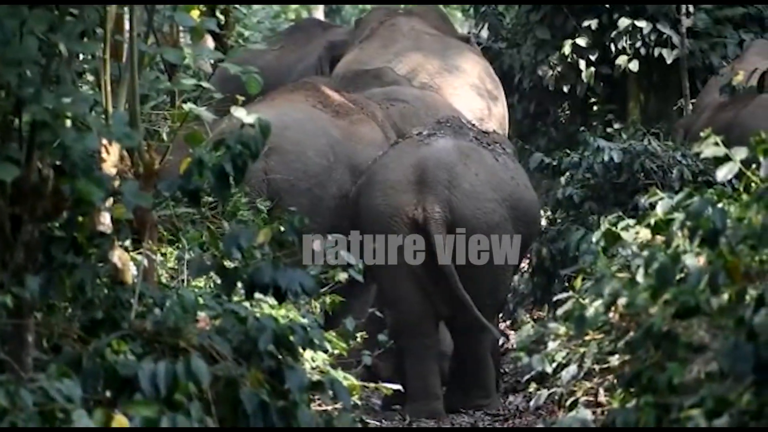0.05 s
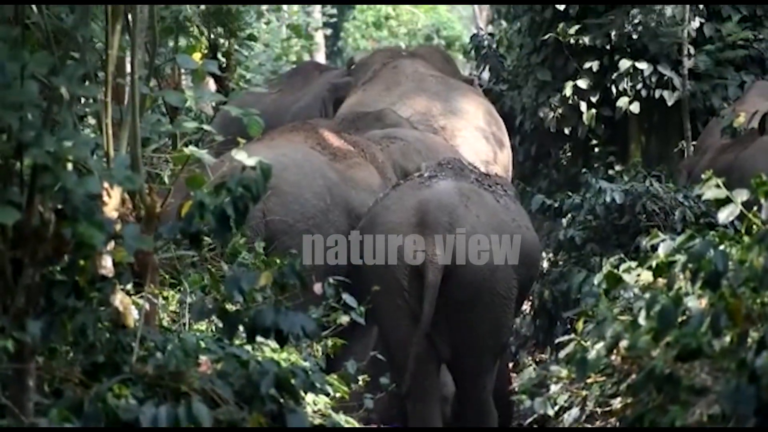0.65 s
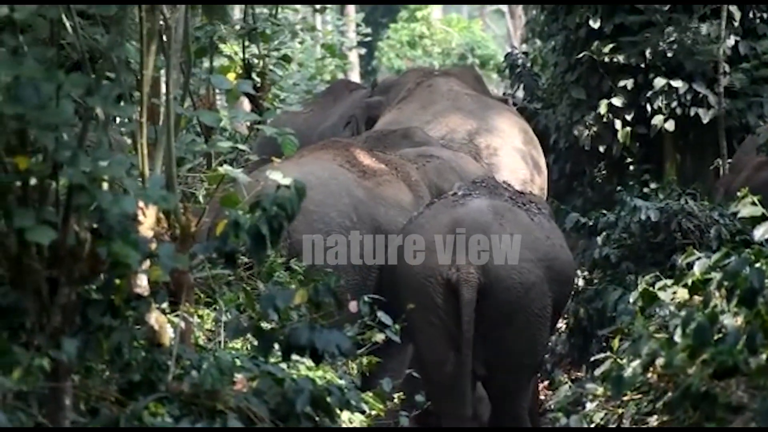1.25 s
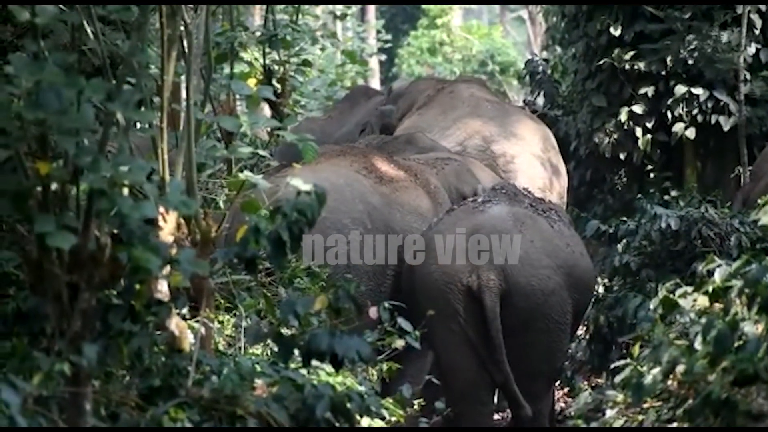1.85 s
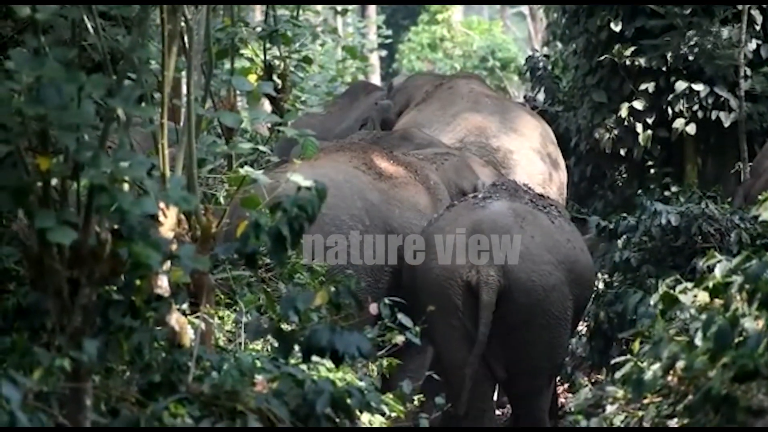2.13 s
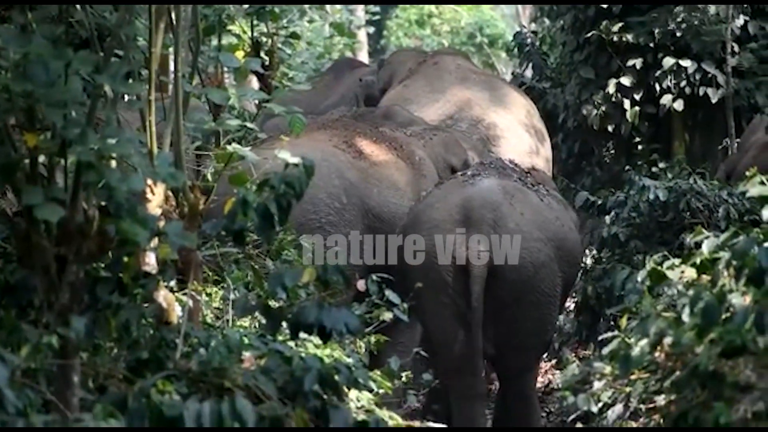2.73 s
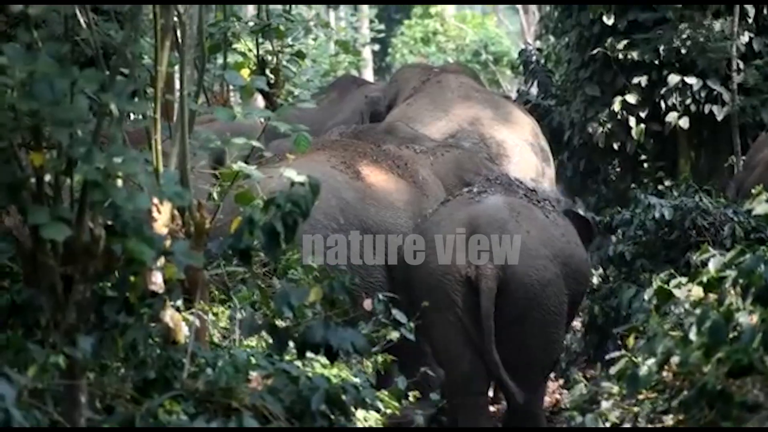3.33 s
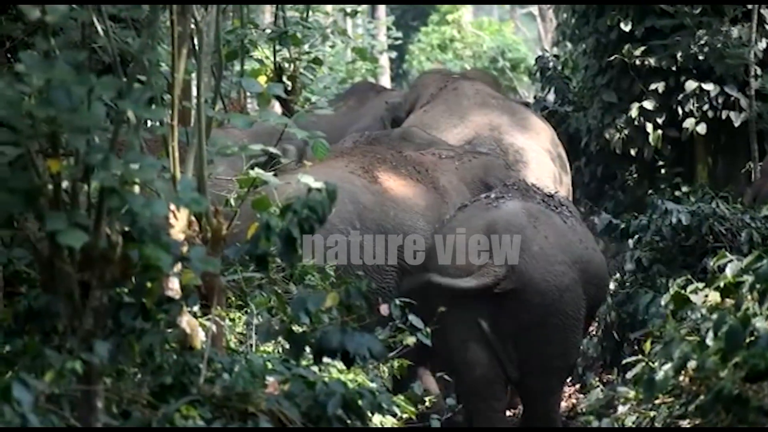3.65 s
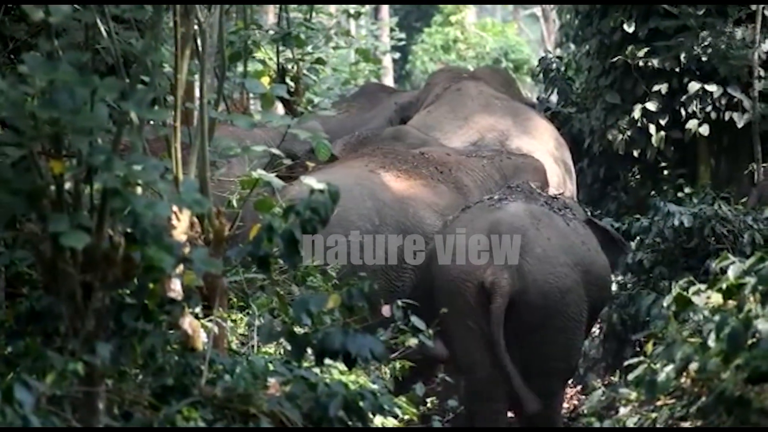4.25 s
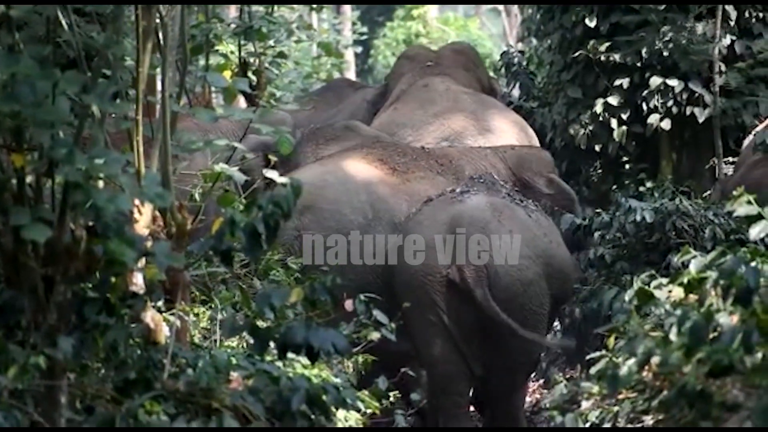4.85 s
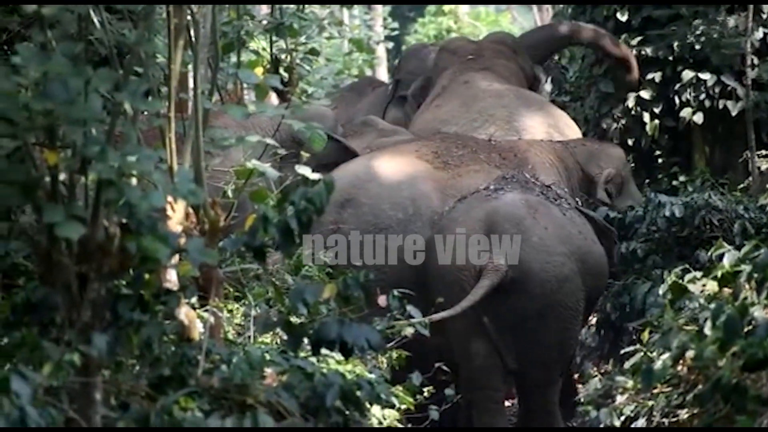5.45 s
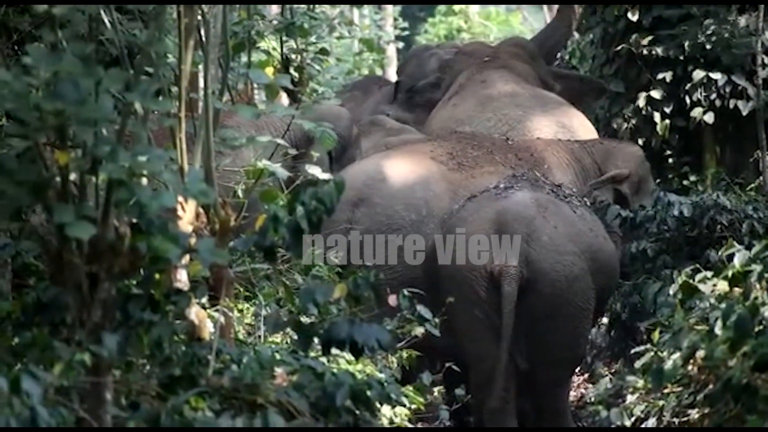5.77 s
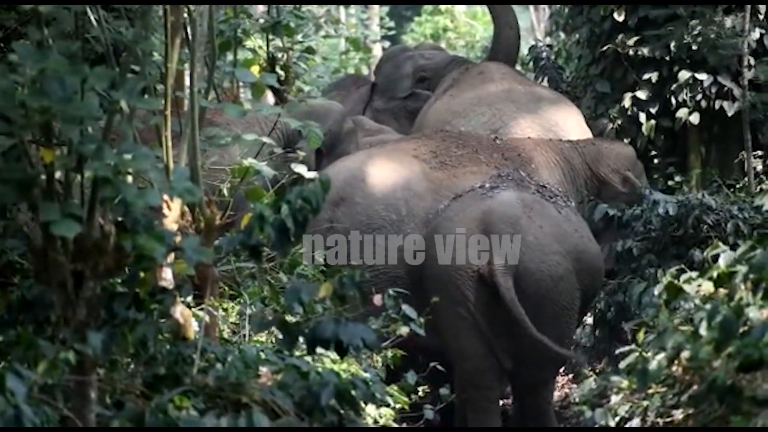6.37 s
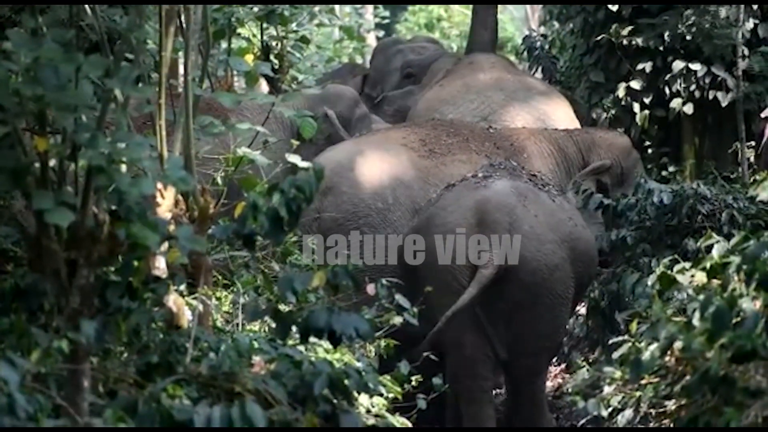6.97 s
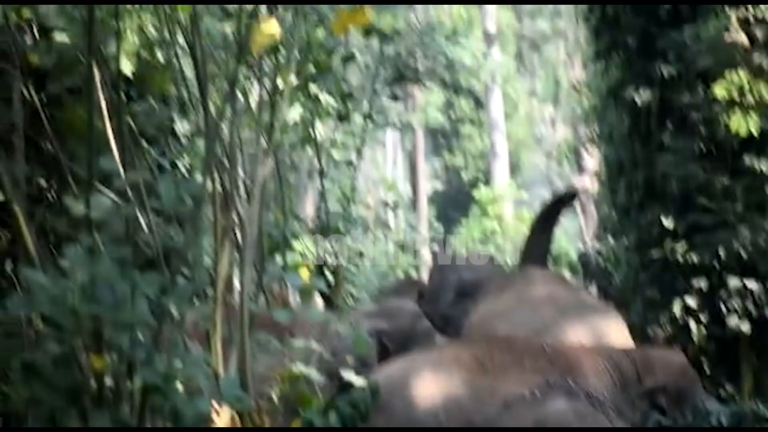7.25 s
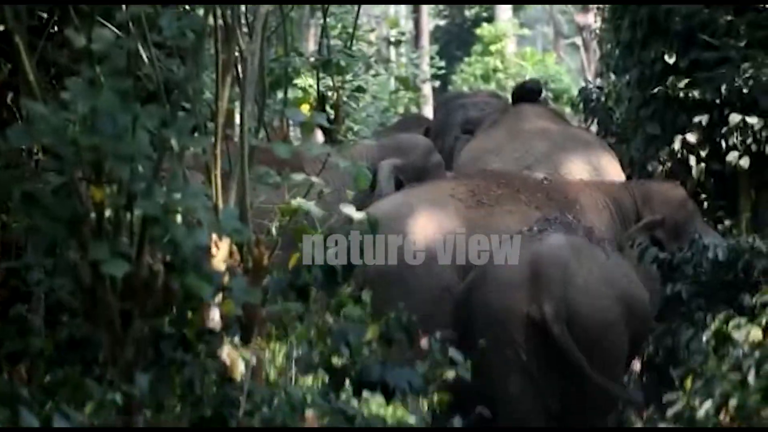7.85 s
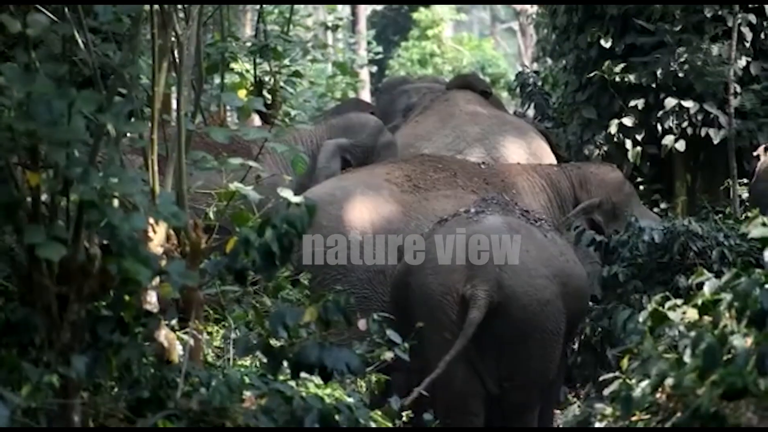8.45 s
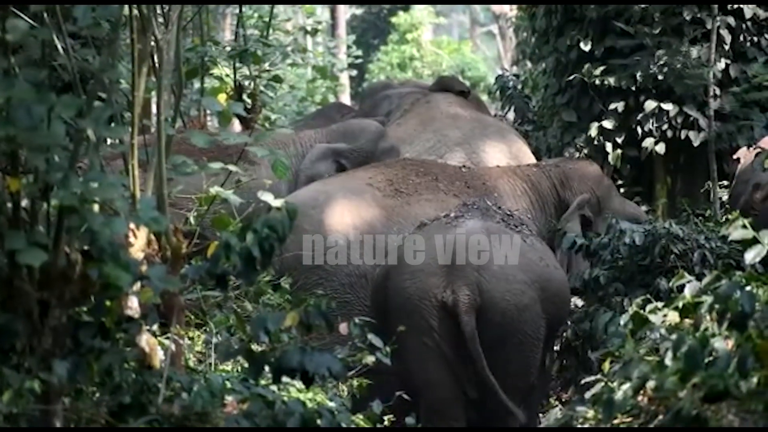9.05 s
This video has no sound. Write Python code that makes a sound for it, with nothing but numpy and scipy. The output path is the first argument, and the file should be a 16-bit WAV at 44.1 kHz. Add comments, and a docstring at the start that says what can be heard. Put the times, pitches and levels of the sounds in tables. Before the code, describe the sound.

A nearby bird repeats an arched three-note whistle, louder each time, over faint forest chirps and elephants' soft flaps and knocks.

```python
"""A bird close to the microphone repeats an arched three-note whistle, higher and louder each time.
Small birds chirp above it and a far one trills, each voice a nearly pure tone from the syrinx.
Elephants shift in the undergrowth with soft flaps, knocks and rustles. The place is a forest:
the trees throw every call back, and air in the leaves and far insects make a steady hush."""
import sys
import numpy as np
from scipy import signal
from scipy.fft import rfft, irfft
from scipy.io import wavfile
from scipy.ndimage import uniform_filter1d

SR = 44100
rng = np.random.default_rng(int(sys.argv[2]) if len(sys.argv) > 2 else 0)


def file_out(sig):
    """Save sig as 16-bit WAV at sys.argv[1]."""
    # one column per channel
    cols = np.atleast_2d(sig).T
    # limit, then scale
    lim = np.clip(cols, -1, 1)
    pcm = np.round(lim * 32767).astype(np.int16)
    wavfile.write(sys.argv[1], SR, pcm)


N = 406161
TIME = np.arange(N) / SR

# Each row: start of a phrase in seconds, effort from 0 to 1.
WHISTLE_PHRASES = [(.564, 0), (2.914, 0.19), (5.029, 0.46), (6.965, .78), (8.855, 1)]
# An arch, a swoop and a flick. Each row: offset, rise, hold and fall in seconds, share of pitch gained
# per second, share lost in the fall, top pitch in Hz, level in dB, then Hz and dB added by full effort.
WHISTLE_NOTES = [(0, .061, .073, .075, 0.091, .2, 1823, -37.5, 235.7, 13),
                 (0.334, .067, .06, .092, 0.0077, .305, 1961, -30.5, 234, 8),
                 (.551, .018, .001, .07, 0, .115, 1745, -35.5, 150, 4)]
def whistler(slowing=.028):
    """The near bird repeats one phrase; effort makes it higher, louder and a little slower."""
    out = np.zeros(N)
    for start, effort in WHISTLE_PHRASES:
        stretch = 1 + slowing * effort
        for offset, rise, hold, fall, creep, drop, top_hz, db, more_hz, more_db in WHISTLE_NOTES:
            note = whistled_note(rise, hold * stretch, fall, creep, drop, top_hz + more_hz * effort, effort)
            add(out, start + offset * stretch, gain_of(db + more_db * effort) * note)
    return out


# Each row: multiple of the pitch, level in dB against the fundamental at zero effort.
WHISTLE_OVERTONES = [(2, -37), (3, -30), (5, -55)]
def whistled_note(rise_s, hold_s, fall_s, creep, drop, top_hz, effort, scoop=.25, fade_s=.014):
    """A note scoops up as it swells, holds or creeps higher, then falls away and softens."""
    t = np.arange(0, rise_s + hold_s + fall_s + fade_s, 1 / SR)
    rise_left = np.maximum(1 - t / rise_s, 0)
    fallen = drop * np.sin(np.pi / 2 * np.clip((t - rise_s - hold_s) / fall_s, 0, 1)) ** 2
    hz = top_hz * (1 - scoop * rise_left ** 2 + creep * (t - rise_s) - fallen)
    loudness = gain_of(-17 * rise_left - 48.5 * fallen)
    fade = np.minimum(np.minimum(t, t[::-1]) / fade_s, 1)
    partials = [(1, 0)] + [(k, db - 2 * effort) for k, db in WHISTLE_OVERTONES]  # purer with effort
    return loudness * fade * voice(hz, jitter=.0033, partials=partials)


# Each row: delay at the microphone in seconds, level in dB against the direct sound.
GROUND_AND_TRUNK = [(.00491, -11.3), (.01937, -15.4)]
def reflected(x):
    """Ground and trunk return the whistle a moment late: some pitches cancel, and the glides beat."""
    return x + sum(gain_of(db) * np.interp(TIME - delay, TIME, x) for delay, db in GROUND_AND_TRUNK)


# Each row: start and length in seconds, first, middle and last pitch in Hz, level in dB.
DROOPING_CALLS = [(.695, 0.21, 4914, 4875, 4720, -44.5), (0.708, 0.13, 3620, 3514, 3520, -56.5),
                  (5.573, 0.13, 5020, 5067, 4790, -45.5), (5.628, .078, 3800, 3640, 3690, -55),
                  (5.712, 0.069, 4860, 4777, 4630, -41)]
# Each row: multiple of the pitch, relative level in dB.
DROOPING_PARTIALS = [(1, 0), (1.37, -20)]
def thin_caller():
    """Thin calls droop back among the trees, each with a faint tone above it."""
    out = np.zeros(N)
    for start, length, *pitches, db in DROOPING_CALLS:
        add(out, start, gain_of(db) * glide(length, *pitches, jitter=.0015, partials=DROOPING_PARTIALS))
    return out


# Each row: start and length of the climb in seconds, first pitch in Hz, level in dB.
RISING_CHIRPS = [(1.215, 0.041, 4000, -56), (1.411, 0.051, 4510, -58.5), (1.579, 0.077, 4430, -54),
                 (1.898, .062, 4630, -58), (2.281, 0.054, 5500, -54), (2.449, 0.05, 4570, -50),
                 (4.718, .08, 4250, -57.5), (5.857, 0.049, 5810, -54), (6.142, 0.063, 3850, -55.5),
                 (6.307, 0.081, 4190, -54), (7.468, 0.037, 6100, -56), (7.761, .068, 4000, -58.5),
                 (7.918, 0.085, 4347, -54.5), (8.891, 0.086, 4390, -55)]
# Each row: start in seconds, first and last pitch in Hz (sung 3% flatter), level in dB.
FALLING_CHIPS = [(.62, 7140, 6400, -56.5), (2.215, 6050, 5550, -49), (5.049, 4800, 4400, -52.5),
                 (5.25, 6100, 5560, -54.5), (6.385, 6420, 6060, -52.5), (6.65, 4780, 4490, -52.5),
                 (6.84, 6390, 5300, -51.5), (7.06, 6890, 6350, -56), (8, 6400, 6070, -56),
                 (8.615, 6370, 6100, -57.5), (8.742, 4410, 4250, -54), (8.955, 6100, 5800, -50),
                 (9.1, 6150, 5600, -51.5)]
def chirper(climb_hz_per_s=21000, ease_s=.008, swell_db=2, chip_s=.032, jitter=.009):
    """A small bird some way off mixes swelling, climbing chirps with short falling chips."""
    out = np.zeros(N)
    for start, length, start_hz, db in RISING_CHIRPS:
        t = np.arange(-ease_s, length + ease_s, 1 / SR)
        hz = start_hz + climb_hz_per_s * uniform_filter1d(np.clip(t, 0, length), int(2 * ease_s * SR))
        loudness = gain_of(db + swell_db * (t / length - .5)) * signal.windows.tukey(len(t), .4)
        add(out, start - ease_s, loudness * voice(hz, jitter))
    for start, start_hz, end_hz, db in FALLING_CHIPS:
        middle_hz = start_hz + .62 * (end_hz - start_hz)  # most of the fall comes early
        add(out, start, gain_of(db) * glide(chip_s, start_hz, middle_hz, end_hz, jitter, [(.97, 0)]))
    return out


# Each row: start and length in seconds, level in dB.
CONTACT_PIPS = [(1.101, 0.022, -59), (3.61, .018, -59), (4.27, 0.073, -66), (4.92, .021, -63.5),
                (5.118, 0.015, -59), (8.13, 0.015, -59)]
def pipper(hz=6700):
    """A tiny bird nearby gives faint contact pips on one high pitch."""
    out = np.zeros(N)
    for start, length, db in CONTACT_PIPS:
        add(out, start, gain_of(db) * glide(length, hz, hz, hz, jitter=.0026))
    return out


# Each row: start in seconds, level in dB.
HIDE_FLAPS = [(1.138, -33), (1.406, -47), (5.393, -32.5)]
TWIG_TICKS = [(.625, -49.5), (1.875, -52), (3.012, -45), (6.888, -51.5)]
# Their spectra. Each row: frequency in Hz, relative level in dB.
FLAP_SPECTRUM = [(30, -39), (70, -28.5), (140, -4.5), (400, -3), (650, -11.5), (1200, -11), (2500, -26),
                 (8000, -48)]
TICK_SPECTRUM = [(1000, -15), (3000, -9.5), (6500, 1.5), (7400, -7.5), (9000, -28.5), (14000, -43)]
def flaps_and_ticks():
    """The elephants' ears and tails slap dully on hide, and twigs tick."""
    flaps = bursts(HIDE_FLAPS, FLAP_SPECTRUM, rise_s=.0037, t60=.063)
    return flaps + bursts(TWIG_TICKS, TICK_SPECTRUM, rise_s=.001, t60=.1)


# Each row: start and length in seconds, thud pitch in Hz, thud level and leaf level in dB.
FOOT_SHUFFLES = [(1.79, 0.14, 135, -55, -60), (2.81, 0.1, 129, -58.5, -73), (3.17, 0.065, 130, -54.5, -86),
                 (6.273, 0.18, 275, -50.5, -50.5)]
# Each row: frequency in Hz, relative level in dB.
LEAF_SPECTRUM = [(300, -16.5), (700, 8), (2500, 8.5), (5000, -14.5), (8000, -20.5), (14000, -31)]
def shuffles():
    """Heavy feet in the undergrowth: a low thud and a rustle swell and fade together."""
    out = np.zeros(N)
    for start, length, hz, thud_db, leaves_db in FOOT_SHUFFLES:
        rumble = resonate(rng.standard_normal(SR), hz, .6 * hz)
        thud = gain_of(thud_db) * unit_rms(resonate(rumble, hz, .6 * hz))
        rustle = gain_of(leaves_db) * noise(LEAF_SPECTRUM, SR)
        swell = signal.windows.hann(int(length * SR))
        add(out, start, swell * (thud + rustle)[:len(swell)])
    return out


# Each row: start in seconds, level of the strike in dB.
KNOCK_STRIKES = [(1.272, -46.5), (3.038, -48), (4.73, -49), (5.565, -49.5), (6.39, -49.5), (7.238, -46),
                 (8.06, -51), (8.925, -48)]
# Each row: frequency and bandwidth in Hz, relative gain in dB.
HOLLOW_MODES = [(604, 33.4, 15.5), (900, 180, -5), (1250, 850, -17)]
def knocks(boost_db=14):
    """Hollow knocks from the herd: each short strike rings three resonances."""
    strikes = bursts(KNOCK_STRIKES, LEAF_SPECTRUM, rise_s=.005, t60=.081)
    return sum(gain_of(boost_db + db) * resonate(strikes, hz, width) for hz, width, db in HOLLOW_MODES)


# Each row: start and length in seconds, first pitch in Hz, level in dB.
FAR_TRILLS = [(1.464, 0.22, 1192, -59.5), (3.862, 0.14, 1273, -53.5), (4.755, 0.17, 1185, -60.5),
              (5.399, 0.16, 1284, -54), (5.931, 0.21, 1219, -60), (6.906, 0.2, 1287, -53),
              (7.328, 0.1, 1170, -60), (8.412, 0.28, 1287, -55)]
def triller(step_s=.04, sink=.145):
    """A far bird's loose rattle: uneven down-slurred pips on a sinking pitch."""
    out = np.zeros(N)
    for start, length, start_hz, db in FAR_TRILLS:
        for at, (late, sharp, strong) in zip(np.arange(0, length, step_s), rng.uniform(-1.003, 1, (20, 3))):
            hz = start_hz * (1 - sink * at / length) * (1 + .04 * sharp)
            pip = glide(.02, 1.04 * hz, .98 * hz, .86 * hz, jitter=.015)
            add(out, start + at + .005 * late, gain_of(db + 2 * strong) * pip)
    return out


def far_run(start_s=3.34, step_s=.22, note_s=.055, low_hz=3774, sink_hz_per_s=320, db=-65):
    """A far bird evenly repeats a low slur and a high held note; the high one sinks along the run."""
    out = np.zeros(N)
    for at in np.arange(7) * step_s:
        high_hz = 5360 - sink_hz_per_s * at
        add(out, start_s + at, glide(note_s, low_hz, low_hz, 1.02 * low_hz, jitter=.01))
        add(out, start_s + at + note_s / 2, glide(note_s, high_hz, high_hz, high_hz, jitter=.0061))
    return gain_of(db) * out


# Each row: nominal pitch in Hz, relative level in dB.
CHORUS_REGISTERS = [(2800, -4), (3500, -6.5), (3950, -3), (5100, -3.5), (5200, -2.5)]
# Each row: time in seconds, level of the whole chorus in dB.
CHORUS_LEVELS = [(0, -59), (1.3, -67), (1.9, -56), (3.2, -61), (4.6, -63), (5.3, -56.5), (7.5, -72),
                 (8.3, -60), (9.2, -71)]
def chorus(count=300):
    """Many small birds deep in the forest, each chirp a brief upward slur."""
    out, registers = np.zeros(N), len(CHORUS_REGISTERS)
    for k, (late, sharp, long) in enumerate(rng.random((count, 3))):
        register_hz, db = CHORUS_REGISTERS[k % registers]
        hz = register_hz * (.9163 + .1274 * sharp)
        chirp = glide(.0298 + .05065 * long, .9 * hz, hz, 1.03 * hz, jitter=.015)
        add(out, (k + late * registers) / count * N / SR - .1, gain_of(db) * chirp)
    return unit_rms(out) * gain_of(np.interp(TIME, *np.transpose(CHORUS_LEVELS)))


# Each row: frequency in Hz, seconds for the far echo to fall 60 dB.
TAIL_T60 = [(200, 0.73), (1100, 2.7), (2000, 1.58), (5000, 1.11), (9000, 0.82)]
def forest(x, near_db, far_db, near_t60):
    """Trunks near the microphone scatter a quick echo; the deep forest adds a long tail."""
    t = np.arange(2 * SR) / SR
    near, far = rng.standard_normal((2, len(t))) * (rng.random((2, len(t))) < 2000 / SR)  # sparse echoes
    near *= gain_of(-60 * t / near_t60) * (t > .004)
    hz, at, bands = signal.stft(far * (1 - np.exp(-t / .022)), SR, nperseg=256)
    decay = gain_of(-60 * at / curve_at(TAIL_T60, hz)[:, None])
    far = signal.istft(bands * decay, SR, nperseg=256)[1][:len(t)]
    echo = gain_of(near_db) * near / np.linalg.norm(near) + gain_of(far_db) * far / np.linalg.norm(far)
    return signal.fftconvolve(x, echo)[:N]


# Each row: frequency in Hz, relative level in dB.
HUSH_SPECTRUM = [(20, -17.5), (48, -4), (70, -3), (130, -1.5), (300, -1), (620, -4), (720, -1), (820, -5),
                 (1400, -5), (2800, -9.5), (4400, -9), (5200, -8.5), (6600, -12.5), (7500, -20),
                 (14000, -32)]
def hush(db=-55, patchy_db=2.05):
    """Air in the leaves and far insects: steady noise with faint drifting patches above the bass."""
    hz, _, bands = signal.stft(noise(HUSH_SPECTRUM, N), SR, nperseg=1024, noverlap=768)
    patches = uniform_filter1d(rng.standard_normal(bands.shape), size=6, axis=0)
    patches = unit_rms(uniform_filter1d(patches, size=16, axis=1))
    bands *= gain_of(patchy_db * patches * (hz / (hz + 300))[:, None])
    return gain_of(db) * unit_rms(signal.istft(bands, nperseg=1024, noverlap=768)[1][:N])


def voice(hz, jitter, partials=((1, 0),)):
    """A syrinx follows the pitch curve with a quick random waver; partials are (multiple, dB)."""
    waver = unit_rms(uniform_filter1d(uniform_filter1d(rng.standard_normal(SR), 200), 200))[:len(hz)]
    phase = 2 * np.pi * np.cumsum(hz * (1 + jitter * waver)) / SR
    return np.sqrt(2) * sum(gain_of(db) * np.sin(k * phase) for k, db in partials)


def glide(length, start_hz, middle_hz, end_hz, jitter, partials=((1, 0),)):
    """A short call that bends through three pitches."""
    progress = np.linspace(0, 1, int(length * SR))
    hz = np.polyval(np.polyfit([0, .5, 1], [start_hz, middle_hz, end_hz], 2), progress)
    return voice(hz, jitter, partials) * signal.windows.tukey(len(hz), .25)


def bursts(rows, spectrum, rise_s, t60):
    """Short bursts of noise that swell and die."""
    out, t = np.zeros(N), np.arange(SR // 4) / SR
    for start, db in rows:
        envelope = gain_of(db - 60 * t / t60) * (1 - np.exp(-t / rise_s))
        add(out, start, envelope * noise(spectrum, len(t)))
    return out


def noise(spectrum, size):
    """Noise of rms one with the given spectrum."""
    gains = gain_of(curve_at(spectrum, np.fft.rfftfreq(size, 1 / SR)))
    return unit_rms(irfft(rfft(rng.standard_normal(size)) * gains, size))


def resonate(x, hz, width):
    """One resonance of gain one."""
    return signal.lfilter(*signal.iirpeak(hz, hz / width, SR), x)


def curve_at(points, hz):
    """Interpolates on a log-frequency axis."""
    point_hz, value = np.transpose(points)
    return np.interp(np.log(hz + 1), np.log(point_hz + 1), value)


def gain_of(db):
    """Decibels to amplitude."""
    return 10 ** (np.asarray(db) / 20)


def unit_rms(x):
    """Scales to an rms of one."""
    return x / np.sqrt(np.mean(x ** 2) + 1e-20)


def add(mix, start_s, sound):
    """Mixes a sound in at its start time."""
    part = mix[max(round(start_s * SR), 0):][:len(sound)]
    part += sound[:len(part)]


def scene():
    """One microphone in the forest: the farther a source, the more of it arrives as echo."""
    song = whistler()
    elephants = flaps_and_ticks() + knocks() + shuffles()
    trills, thin, chirps, pips, run = triller(), thin_caller(), chirper(), pipper(), far_run()
    out = reflected(song) + forest(song, near_db=-9.5, far_db=-13.5, near_t60=.64)
    out += thin + forest(thin, near_db=-5.5, far_db=-3, near_t60=.54)
    out += gain_of(-1) * chirps + forest(chirps, near_db=-2, far_db=-1.5, near_t60=.1)
    out += pips + forest(pips, near_db=-16, far_db=-15.5, near_t60=.19)
    out += gain_of(2.5) * trills + forest(trills, near_db=2, far_db=.5, near_t60=.33)
    out += elephants + forest(elephants, near_db=-21, far_db=-14, near_t60=.3)
    out += run + forest(chorus() + run, near_db=-1.5, far_db=-6, near_t60=.32)  # chorus as echo only
    return (out + hush())[None]


def record(dry):
    """The recorder's band limit cuts the highest treble."""
    lowpass = signal.firwin(511, 14277, window=("kaiser", 9), fs=SR)
    return signal.oaconvolve(dry, lowpass[None], "same")


dry = scene()
out = record(dry)
file_out(out)
```